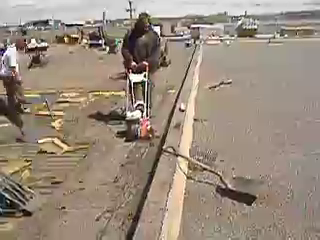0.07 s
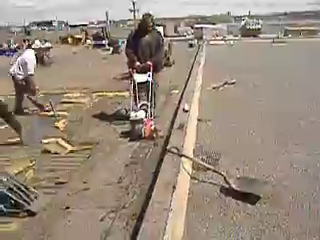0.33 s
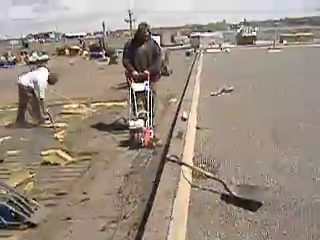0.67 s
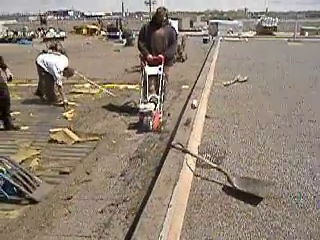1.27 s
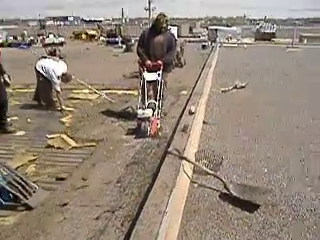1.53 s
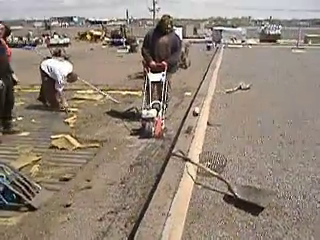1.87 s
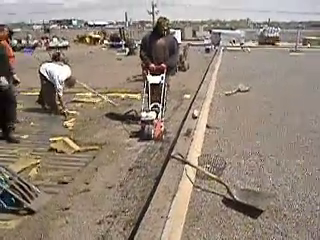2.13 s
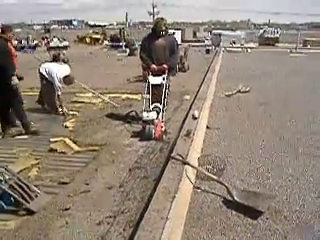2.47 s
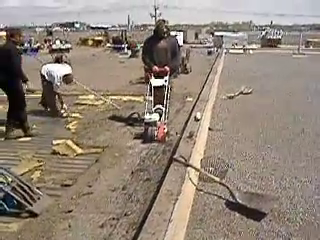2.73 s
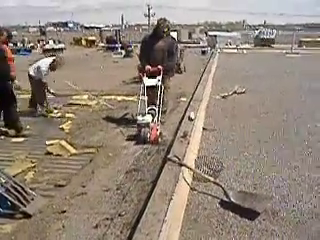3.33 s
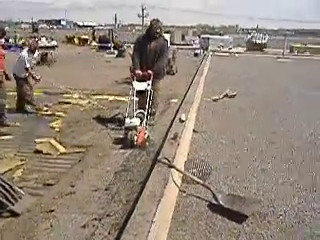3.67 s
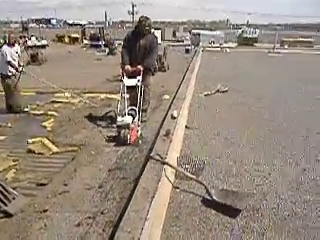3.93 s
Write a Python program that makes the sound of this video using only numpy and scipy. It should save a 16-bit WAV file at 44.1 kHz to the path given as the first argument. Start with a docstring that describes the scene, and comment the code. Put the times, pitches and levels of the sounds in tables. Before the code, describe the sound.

A petrol roof cutter runs loudly, its blade grinding and ringing through gravel.

```python
"""A flat gravel roof in the open air, with a roof cutter working close to a single microphone.
Its single-cylinder four-stroke petrol engine thumps and rattles, the governor hunting gently.
The blade grinds and rings in the grit; near the end it bites and drags the engine down.
Underneath, the machine rumbles and knocks on the deck, and wind nudges the microphone,
whose amplifier switches on with a pop at the start."""
import sys
import numpy as np
from scipy.fft import rfft, irfft, next_fast_len
from scipy.io import wavfile
from scipy.ndimage import uniform_filter1d, map_coordinates

SR = 44100
rng = np.random.default_rng(int(sys.argv[2]) if len(sys.argv) > 2 else 0)


def wav_record(signal):
    """Record a signal, one row per channel, as 16-bit PCM in the file named by sys.argv[1]."""
    frames = np.transpose(np.atleast_2d(signal))
    bounded = np.clip(frames, -1, 1)
    # unit amplitude maps onto the largest positive 16-bit level
    quanta = np.round(bounded * 32767).astype(np.int16)
    wavfile.write(sys.argv[1], SR, quanta)


N = 176400

# Levels in the tables are relative; each source adds its own gain.
# wind on the microphone: time_s, level_db
WIND_LEVEL = [(0.2, -26.5), (0.44, -28), (0.54, -27), (0.57, -31), (0.72, -16.5), (0.8, -37.5),
              (1.02, -21.5), (1.45, -33), (1.47, -31), (1.66, -19.5), (1.7, -34), (1.75, -26.5),
              (1.93, -34), (1.97, -22), (2.1, -37.5), (2.37, -26), (2.4, -35), (2.83, -26.5), (3.41, -47),
              (3.6, -28), (3.62, -40), (4.0, -34)]
# colour of the wind: frequency_hz, level_db
WIND_COLOUR = [(10, -2.5), (25, 6), (42, -8), (62, 2), (90, -15), (150, -27.5), (250, -52.5)]
# rumble of the roof deck: time_s, level_db
RUMBLE_LEVEL = [(.1, -30), (.55, -31), (1.1, -31.5), (1.4, -35), (1.8, -32), (2.2, -36), (3.0, -36),
                (4, -37)]
# colour of the rumble: frequency_hz, level_db
RUMBLE_COLOUR = [(45, -15), (80, 0), (115, 0), (170, -9), (300, -20), (500, -35)]
# knocks of the frame on the roof: start_s, level_db, pitch_hz
KNOCKS = [(0.278, -11, 284), (.31, -16, 305), (0.541, -19, 115), (1.146, -16, 158), (1.504, -19, 282),
          (1.762, -14, 119), (3.073, -15, 252), (3.134, -21, 250)]

# rattle of the engine and its guards: time_s, level_db
RATTLE_LEVEL = [(0.1, -31.5), (0.11, -27), (0.23, -30), (0.52, -24), (0.56, -27.5), (0.69, -25.5),
                (0.78, -34.5), (0.87, -26), (1.47, -32.5), (3.3, -30.5), (3.92, -32.5), (4.0, -29)]
# colour of the rattle: frequency_hz, level_db
RATTLE_COLOUR = [(400, 2.5), (650, -11), (760, -1), (900, 2), (1200, -1.5), (1400, -3), (1560, -10),
                 (2100, -11), (3000, -33.5)]
# panel resonances of the guard: pitch_hz, width_hz, level_db
GUARD_MODES = [(798.5, 11, -23.5), (903, 8.3, -27.5), (1151, 73, -15), (1293, 20, -25)]
# engine speed, two shaft turns to a four-stroke cycle: time_s, cycles_per_s
ENGINE_SPEED = [(0.0, 31.42), (0.16, 31.74), (0.3, 29.25), (0.7, 31.12), (0.85, 30.29), (1.05, 31.13),
                (1.2, 29.58), (1.45, 31.11), (1.62, 30.1), (1.85, 30.84), (2.0, 30.44), (2.3, 31.07),
                (2.55, 30.42), (2.8, 32.02), (3.0, 30.52), (3.3, 30.55), (3.42, 27.91), (3.55, 23.21),
                (3.66, 24.23), (3.8, 28.35), (4.0, 31.22)]
# where each gas thump begins: phase_cycles, direction (1 pushes, -1 sucks)
THUMP_TIMING = [(.038, 1), (.357, -1), (.618, 1)]
# sound of each thump: pitch_hz, swell_s, level_db
THUMPS = [(240, .0018, -17), (365, .0017, -17), (338, .0035, -19.3)]
# colour of the gas rushing with the thumps: frequency_hz, level_db
PUFF_COLOUR = [(60, -14), (150, -6), (300, -5), (400, 0), (490, -3), (620, -20), (1200, -45)]

# hard scrapes on stones: start_s, level_db, decay_s
SCRAPES = [(0.77, -26.5, 0.17), (1.422, -25.5, 0.068), (3.86, -22.5, .05)]
# the blade in the cut: time_s, grind_db, hiss_db
CUT_LEVELS = [(0.1, -22.5, -21.5), (0.15, -21, -26), (0.66, -24.5, -24), (0.71, -27, -27),
              (0.78, -20.5, -19.5), (0.84, -26, -28), (0.97, -25.5, -25.5), (1.04, -26, -30.5),
              (1.1, -25, -20.5), (1.13, -26, -27), (1.47, -22, -24.5), (1.65, -28.5, -32),
              (1.71, -23.5, -25.5), (1.95, -24.5, -26.5), (2.01, -29, -33.5), (2.03, -24.5, -27.5),
              (2.26, -27, -29), (2.62, -25.5, -30), (2.64, -28.5, -34.5), (3.14, -26.5, -29.5),
              (3.18, -25, -26), (3.48, -22.5, -29), (3.5, -26, -31), (3.67, -26, -29), (3.69, -28.5, -30.5),
              (3.78, -29, -30), (3.84, -26, -27), (4.0, -27.5, -26)]
# colour of the grinding: frequency_hz, level_db
GRIND_COLOUR = [(1200, -19.5), (2160, -12), (2320, -3.5), (2780, -1.5), (2980, -6.5), (3500, -2.5),
                (4200, 1), (4600, -4.5), (5200, -17.5)]
# colour of the gritty hiss: frequency_hz, level_db
HISS_COLOUR = [(3000, -6), (4850, -7), (5150, 2), (5750, 2.5), (6400, 1), (7000, -1.5), (7600, 0.5),
               (8100, -5), (8500, -14), (8900, -29.5)]
# the steel blade's main ringing mode: time_s, level_db
RING_LEVEL = [(0.1, -34.5), (0.16, -20.5), (0.21, -33), (0.24, -18.5), (0.35, -29), (0.42, -20.5),
              (0.62, -34.5), (0.64, -26.5), (0.69, -37.5), (0.86, -28), (1.01, -35.5), (1.12, -27.5),
              (1.32, -37), (1.34, -30), (1.55, -37), (1.58, -26.5), (1.83, -37.5), (1.87, -28.5),
              (1.95, -34.5), (2.13, -30), (2.23, -40), (2.38, -32.5), (2.41, -37), (2.48, -27),
              (2.54, -37.5), (2.81, -30), (2.87, -47.5), (3.0, -30), (3.02, -51), (3.11, -26.5),
              (3.23, -31), (3.25, -22.5), (3.29, -32.5), (3.3, -23), (3.63, -33), (3.66, -20), (3.73, -38),
              (3.78, -35.5), (3.89, -26.5), (4.0, -33)]
# its weaker modes: pitch_hz, level_db
BLADE_MODES = [(2325, -11), (2450, -13.5), (2660, -16.5), (2770, -14), (3100, -16), (3270, -13),
               (3615, -7.5), (3865, -11), (4100, -7.5), (5490, -12), (5750, -15.5), (6230, -13),
               (7680, -19.5)]

THUMP_DB, PUFF_DB, SHAKE_DB = 1.6, -44, -40.5
THUMP_SCATTER_DB, THUMP_JITTER_S, THUMP_DETUNE = 1.1, .00005, .015
MUFFLER_HZ, MUFFLER_WIDTH_HZ, MUFFLER_DB = 152, 26, -38.5
RING_HZ, SCRAPE_HZ, RING_WIDTH_HZ, MODE_WIDTH_HZ = 4480, 4155, 30, 32
GRIND_DB, RING_DB, MODES_DB, MODE_SWING_DB = -3, 2, -4, 3.5
CHATTER_PER_CYCLE = 11
POP_S, POP_LENGTH_S, POP_DB = .0358, .007, -3.5
SWING_PEAK_S, SWING_WIDTH_S, SWING_DB = .087, .022, -5.5
OPEN_S, FADE_S, TOP_HZ = .078, .045, 8942


def amp(db):
    """Decibels to gain."""
    return 10 ** (np.asarray(db) / 20)


def unit(x):
    """Scale to rms 1."""
    return x / np.sqrt(np.mean(x ** 2) + 1e-20)


def curves(rows):
    """One value per sample for each column after the time."""
    times, *columns = np.transpose(rows)
    return [np.interp(np.arange(N) / SR, times, column) for column in columns]


def wobble(per_s):
    """A smooth random curve with per_s knots a second."""
    return map_coordinates(rng.standard_normal(2048), [np.arange(N) * per_s / SR], mode="wrap")


def filtered(x, response):
    """Pass x through a frequency response."""
    size = next_fast_len(N + SR // 2)
    return irfft(rfft(x, size) * response(np.fft.rfftfreq(size, 1 / SR)), size)[:N]


def coloured(x, colour):
    """Shape x by a colour table, shut off beyond its ends, at rms 1."""
    hz, db = np.transpose(colour)
    return unit(filtered(x, lambda f: amp(np.interp(np.log(f + 1), np.log(hz), db, -120, -120))))


def ringing(drive, hz, width_hz):
    """One resonance struck by the drive, its skirts trimmed, at rms 1."""
    def response(f):
        resonance = 1j * f * width_hz / (hz * hz - f * f + 1j * f * width_hz)
        return resonance / (1 + ((f - hz) / (.05 * hz)) ** 2)
    return unit(filtered(drive, response))


def sustained(x):
    """Even out the slow swells of a narrow noise."""
    return x / np.sqrt(np.abs(uniform_filter1d(x * x, size=4000)) + .15)


def grit(per_s, spread_db, noise_db):
    """Random tiny impacts of uneven size on a bed of noise."""
    hits = (rng.random(N) < per_s / SR) * rng.choice([-1, 1], N)
    sizes = amp(spread_db * np.clip(rng.standard_normal(N), -2, 2))
    return unit(unit(hits * sizes) + amp(noise_db) * rng.standard_normal(N))


def beat(cycles, depth_db):
    """A gain that peaks once in each cycle."""
    return unit(amp(depth_db * np.cos(2 * np.pi * cycles)))


def wind(gain_db=-1):
    """Gusts buffet the microphone in low lumps that ease off."""
    level_db, = curves(WIND_LEVEL)
    return amp(level_db + gain_db) * sustained(coloured(rng.standard_normal(N), WIND_COLOUR))


def deck_rumble():
    """The machine shudders on the roof deck."""
    level_db, = curves(RUMBLE_LEVEL)
    return amp(level_db + 4.2 * wobble(18)) * coloured(rng.standard_normal(N), RUMBLE_COLOUR)


def frame_knocks(attack_s=.002, t60_s=.085):
    """The frame bumps on the roof with a low, rough thud."""
    out, t = np.zeros(N), np.arange(N) / SR
    for start_s, db, hz in KNOCKS:
        age = np.maximum(t - start_s, 0)
        envelope = amp(db - 60 * age / t60_s) * (1 - np.exp(-age / attack_s))
        out += envelope * np.sin(2 * np.pi * hz * age + 1.1 * wobble(120))
    return out


def guard_rattle(cycle, clatter_db=-.5):
    """Loose metal clatters in time with the thumps and rings the guard."""
    level_db, = curves(RATTLE_LEVEL)
    hits = grit(per_s=700, spread_db=3, noise_db=5)
    drive = hits * beat(3 * cycle, depth_db=1.1) * beat(2 * cycle, depth_db=1)
    panels = sum(amp(db + 3.4 * wobble(18)) * ringing(drive, hz, width) for hz, width, db in GUARD_MODES)
    clatter = amp(clatter_db) * coloured(drive, RATTLE_COLOUR)
    return amp(level_db + 1.35 * wobble(35.62)) * (clatter + panels)


def engine_drone(cycle):
    """The block shakes once a turn; the muffler hums on the harmonics near its resonance."""
    speed, = curves(ENGINE_SPEED)
    angle = 2 * np.pi * (cycle - THUMP_TIMING[1][0] - .07)
    shake = np.cos(2 * angle + np.pi / 4)
    hum = sum(np.cos(k * angle) / np.hypot(1, 2 * (k * speed - MUFFLER_HZ) / MUFFLER_WIDTH_HZ)
              for k in (5, 6))
    return np.sqrt(2) * (amp(SHAKE_DB) * shake + amp(MUFFLER_DB) * hum)


def engine_thumps(cycle):
    """The engine pushes and sucks gas in three thumps a cycle, each with a breathy rush."""
    thumps, flow, t = np.zeros(N + SR), np.zeros(N + SR), np.arange(SR // 30) / SR
    whole_cycles = np.arange(2, int(cycle[-1]) + 1)
    for (phase, direction), (hz, swell_s, db) in zip(THUMP_TIMING, THUMPS):
        starts = np.interp(whole_cycles + phase, cycle, np.arange(N))
        shape = (t / swell_s) ** 2 * np.exp(2 - 2 * t / swell_s)
        for start, (size, late, tune) in zip(starts, rng.standard_normal((256, 3))):
            i = int(start + late * THUMP_JITTER_S * SR)
            envelope = amp(db + THUMP_SCATTER_DB * size) * shape
            tone = np.sin(2 * np.pi * hz * (1 + THUMP_DETUNE * tune) * t)
            thumps[i:i + len(t)] += direction * envelope * tone
            flow[i:i + len(t)] += envelope
    puff = coloured(rng.standard_normal(N) * (unit(flow[:N]) + 1.8), PUFF_COLOUR)
    return amp(THUMP_DB) * thumps[:N] + amp(PUFF_DB) * puff


def stone_scrapes():
    """A stone sets the blade's second mode singing for a moment."""
    t = np.arange(N) / SR
    level = sum(amp(db) * (t > start) * np.exp(-((t - start) / decay) ** 2)
                for start, db, decay in SCRAPES)
    return level * sustained(ringing(rng.standard_normal(N), SCRAPE_HZ, RING_WIDTH_HZ))


def blade(cycle):
    """The blade catches unevenly in the gravel: grinding, a hiss of grit and its own ringing modes."""
    grind_db, hiss_db = curves(CUT_LEVELS)
    ring_db, = curves(RING_LEVEL)
    catch = amp(.37 * wobble(31.88) + 1.44 * wobble(110))
    chatter = beat(CHATTER_PER_CYCLE * cycle + .2 * wobble(33), depth_db=-1)
    bite = unit(catch * beat(2 * cycle - .15, depth_db=1.6) * chatter)
    grind = coloured(bite * grit(per_s=2500, spread_db=6, noise_db=2), GRIND_COLOUR)
    hiss = coloured(bite * grit(per_s=3500, spread_db=5.5, noise_db=-2), HISS_COLOUR)
    strikes = lambda: bite * grit(per_s=1100, spread_db=5.5, noise_db=-8.5)  # fresh for each mode
    ring = sustained(ringing(strikes(), RING_HZ, RING_WIDTH_HZ))
    modes = sum(amp(db) * ringing(strikes() * amp(MODE_SWING_DB * wobble(7.85)), hz, MODE_WIDTH_HZ)
                for hz, db in BLADE_MODES)
    cut = amp(GRIND_DB) * grind + amp(MODES_DB) * modes
    return amp(grind_db) * cut + amp(hiss_db) * hiss + amp(ring_db + RING_DB) * ring


def scene():
    """The roof at the microphone, in mono; one shaft drives the engine, the rattle and the blade."""
    cycle = np.cumsum(curves(ENGINE_SPEED)[0]) / SR  # four-stroke cycles elapsed
    cutter = engine_thumps(cycle) + engine_drone(cycle) + guard_rattle(cycle) + blade(cycle)
    return (cutter + stone_scrapes() + frame_knocks() + deck_rumble() + wind())[None]


def record(dry):
    """The microphone's amplifier pops, swings back and opens; its band limit cuts the top treble."""
    t = np.arange(N) / SR
    pop = amp(POP_DB) * (t > POP_S) * np.exp(-np.clip((t - POP_S) / POP_LENGTH_S, 0, 2) ** 8)
    swing = -amp(SWING_DB) * (t > POP_S + POP_LENGTH_S) / (1 + ((t - SWING_PEAK_S) / SWING_WIDTH_S) ** 2)
    live = dry[0] * np.clip((t - OPEN_S) / FADE_S, 0, 1) ** .5
    return filtered(live + pop + swing, lambda hz: np.clip((TOP_HZ - hz) / 400 + .5, 0, 1))[None]


dry = scene()
out = record(dry)
wav_record(out)
```